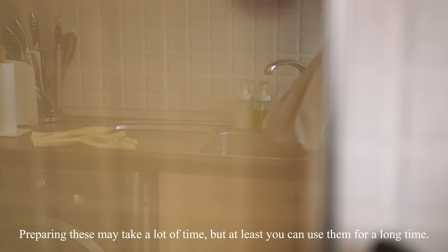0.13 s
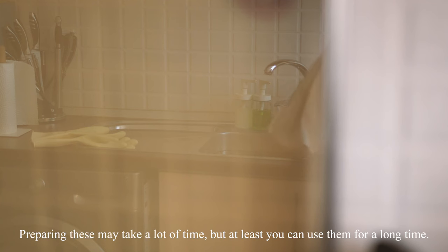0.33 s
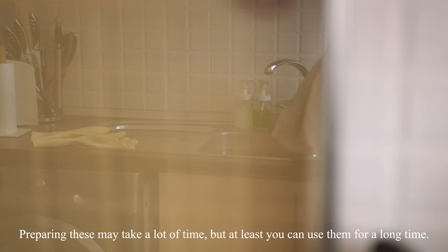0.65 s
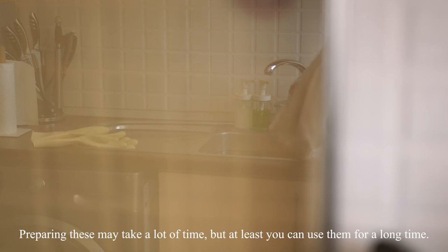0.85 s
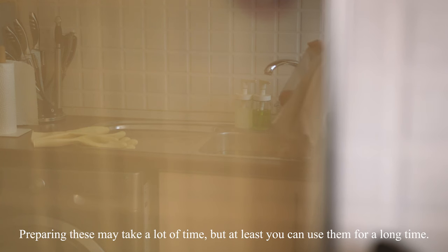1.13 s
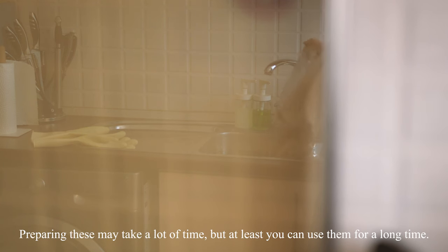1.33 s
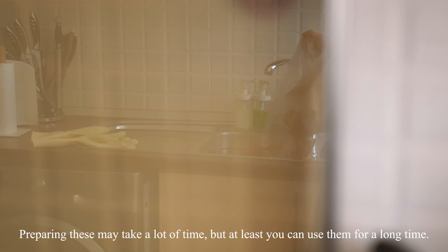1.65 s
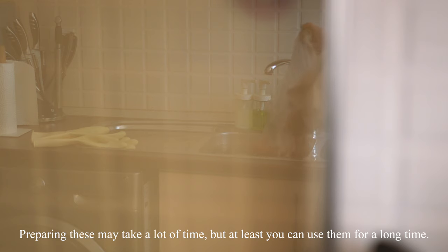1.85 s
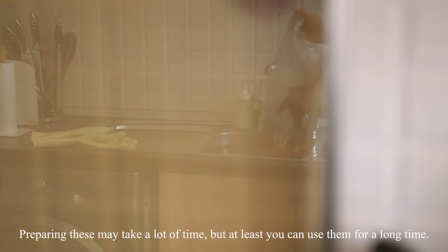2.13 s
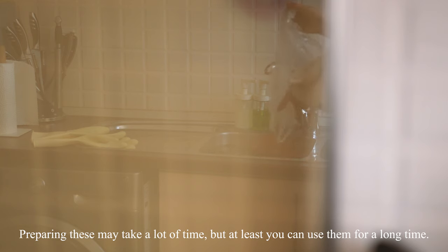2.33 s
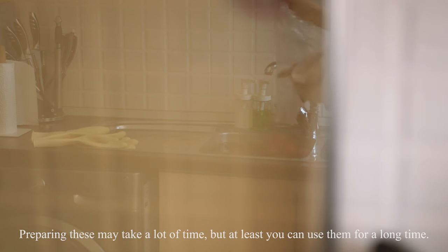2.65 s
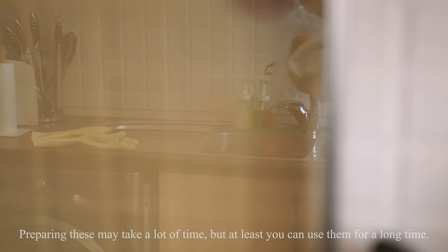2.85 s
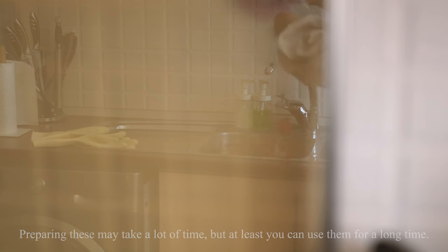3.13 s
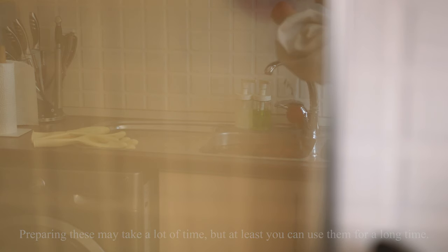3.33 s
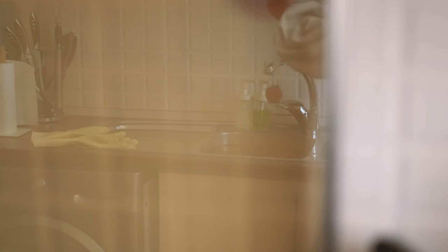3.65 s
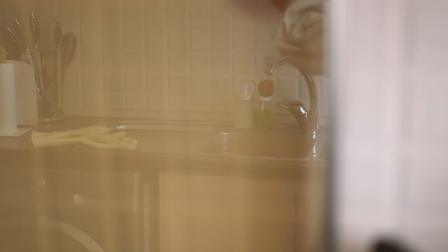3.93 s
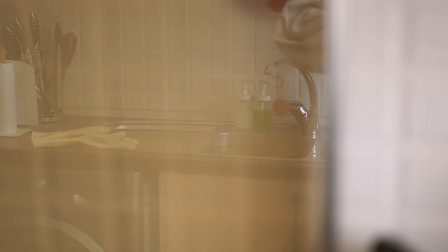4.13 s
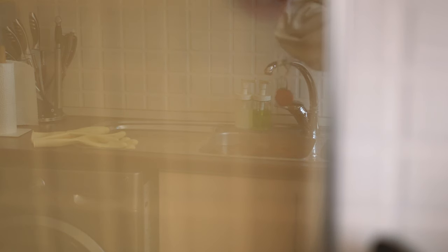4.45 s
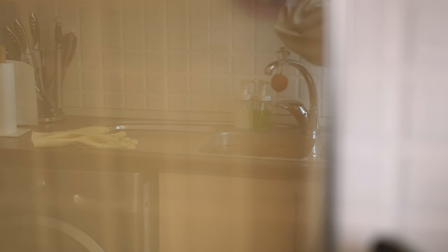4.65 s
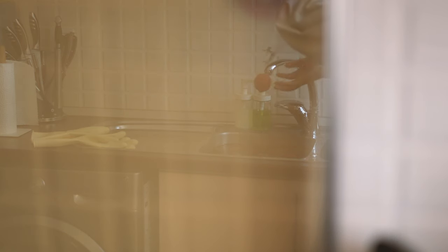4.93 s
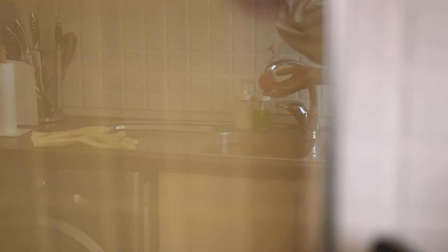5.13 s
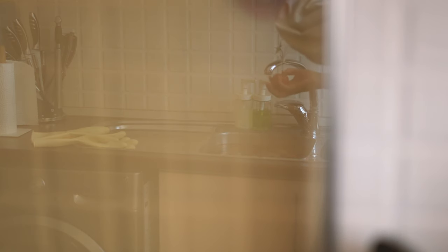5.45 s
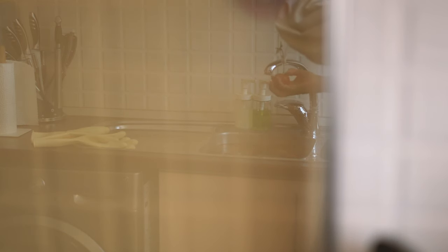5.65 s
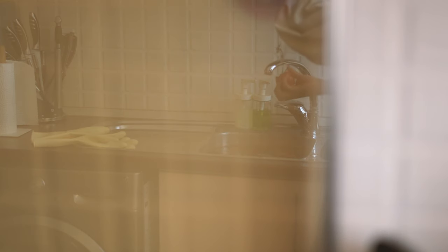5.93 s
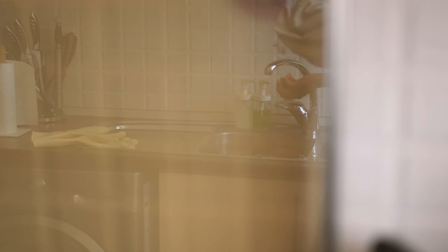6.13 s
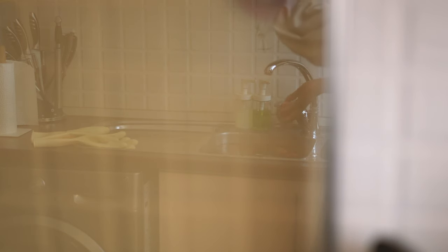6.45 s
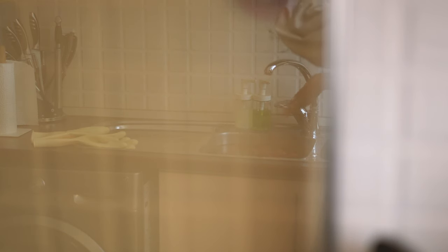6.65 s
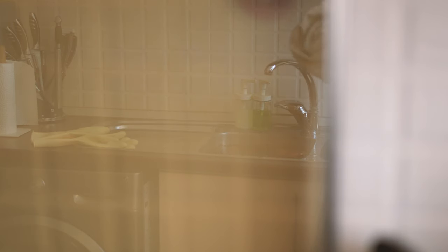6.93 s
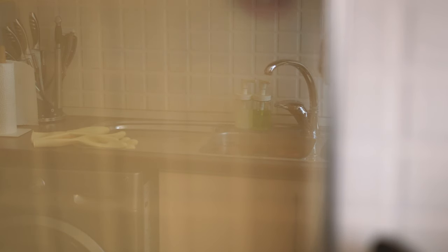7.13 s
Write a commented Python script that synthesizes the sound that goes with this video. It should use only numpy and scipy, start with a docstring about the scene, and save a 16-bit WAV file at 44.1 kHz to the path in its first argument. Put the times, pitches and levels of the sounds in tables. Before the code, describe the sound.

A small tiled kitchen with quiet air and a very faint appliance hum, heard fairly close in stereo, slightly left. From 0 to 1 s a thin fabric bag slides in bright, crinkly swishing strokes with a dull rub beneath. At about 1.1 s fruit begins knocking hollowly; around 1.3 and 1.55 s come the busiest tumbles, hard smacks and sharp cloth flicks, with a brief steel ring and soft low basin boom. More knocks and flicks follow at 1.9 and 2.15 s, the latter the strongest flap. Another small landing comes at 3.0 s, with a last knock near 3.3 s. Rustling continues in short strokes, thinning after 4.4 s. A light tick at 5.15 s and a soft flick at 6.15 s punctuate near silence. At 6.75 s the drain pops and gurgles for a fraction of a second, bubbles dropping in pitch, before a final cloth swish around 7.1 s.

```python
"""A thin fabric bag of fruit is drawn up and emptied over a steel kitchen sink, in a small tiled room.
The cloth, built from shaped noise, swishes in strokes of tiny slips, billows and is flicked.
Its load tumbles and knocks in short decaying tones, and smacks and bumps the basin in noise bursts.
The drain gives one short gurgle of sine bubbles; still air and a faint appliance hum lie underneath."""
import sys
import numpy as np
from scipy import signal
from scipy.fft import rfft, irfft, next_fast_len
from scipy.io import wavfile
from scipy.ndimage import uniform_filter1d, map_coordinates

SR = 44100
rng = np.random.default_rng(int(sys.argv[2]) if len(sys.argv) > 2 else 0)


def materialize(psi):
    """Save the field psi as 16-bit PCM at rate SR to the path in sys.argv[1].

    A 1-D psi becomes a single channel; in a 2-D psi each row is a channel.
    """
    bounded = np.clip(np.atleast_2d(psi).T, -1, 1)
    quanta = np.round(bounded * 32767).astype(np.int16)
    wavfile.write(sys.argv[1], SR, quanta)


N = 321489  # length in samples

# Colour of cloth sliding and creasing. Each row: frequency in Hz, relative density in dB per Hz.
SWISH_SPECTRUM = [(710, -37.5), (1200, -5.5), (2150, -3.5), (3340, -3), (6200, 0.3), (13400, -8),
                  (15800, -12.5)]
# Colour of slack cloth flapping and of drain spray. Each row: frequency in Hz, relative density in dB per Hz.
FLAP_SPECTRUM = [(150, -70), (1000, -16), (1250, -2.5), (3100, -1.5), (4500, -7), (9000, -14)]


def amp(db):
    """Decibels to gain."""
    return 10 ** (np.asarray(db) / 20)


def unit(x):
    """Scale to rms 1."""
    return x / np.sqrt(np.mean(x ** 2) + 1e-20)


def along(points, hz):
    """Read (Hz, value) points on a log frequency axis."""
    f, v = np.transpose(points)
    return np.interp(np.log(hz + 1), np.log(f + 1), v)


def wobble(rate):
    """A smooth random curve through normal draws, rate knots a second."""
    knots = rng.standard_normal(int(N * rate / SR) + 4)
    return map_coordinates(knots, [np.arange(N) * rate / SR])


def filtered(x, response):
    """Multiply the spectrum of x by a response of frequency."""
    m = next_fast_len(N + SR // 2)  # room for the filter to ring out
    return irfft(rfft(x, m) * response(np.fft.rfftfreq(m, 1 / SR)), m)[..., :N]


def resonances(modes, f):
    """Summed response of resonances given as (Hz, width in Hz, dB)."""
    return sum(amp(db) * 1j * f * w / (c * c - f * f + 1j * f * w) for c, w, db in modes)


def add(track, s, sound):
    """Mix a sound in at s seconds."""
    start = round(s * SR)
    part = sound[..., :N - start]
    track[..., start:start + part.shape[-1]] += part


def spread(pair, colour):
    """Two unrelated signals become coloured stereo of rms 1, alike in the bass and wide above."""
    # Likeness of the two channels. Each row: frequency in Hz, correlation from 0 to 1.
    likeness = [(120, 1), (350, 0.96), (700, 0.79), (1400, 0.49), (2500, 0.12)]

    def response(hz):
        turn = np.arccos(np.clip(along(likeness, hz), -1, 1)) / 2
        return amp(along(colour, hz)) * np.array([np.cos(turn), np.sin(turn)])

    mid, side = filtered(pair, response)
    return unit(np.array([mid + side, mid - side]))


def kitchen(x, wet_db):
    """The direct sound plus the short answer of the tiled walls, noise that decays by pitch."""
    # Decay of the tiled room. Each row: frequency in Hz, time in seconds to fall by 60 dB.
    tile_decay = [(200, 0.12), (2000, 0.28), (12000, 0.064)]
    hz, t, z = signal.stft(rng.standard_normal((2, SR // 2)), SR, nperseg=256)
    fading = z * amp(-60 * t / along(tile_decay, hz)[:, None])
    tail = signal.istft(fading, SR, nperseg=256)[1]
    tail = tail / np.linalg.norm(tail[0])
    echo = signal.fftconvolve(np.atleast_2d(x), tail, axes=1)[:, :N]
    return x + amp(wet_db) * echo


def alcove(x, ring_db):
    """The basin and the corner round it favour a few pitches, from low to middle."""
    # Resonances round the sink. Each row: frequency in Hz, width in Hz, relative level in dB.
    sink_modes = [(214, 12, -10), (337.6, 9.9, -8), (589, 24, -5.5), (730, 6.9, 2), (1052, 27, -4),
                  (1662, 25, 10)]
    return unit(filtered(x, lambda f: 1 + amp(ring_db) * resonances(sink_modes, f)))


def room_tone(waver=0.57):
    """Still air as coloured noise, and an appliance hum of sines whose phase wavers (in radians)."""
    # Colour of the still air. Each row: frequency in Hz, relative density in dB per Hz.
    air_colour = [(25, -37.5), (95, -8.5), (160, -14.5), (215, 0), (370, -0.5), (600, 2.5), (2400, -4),
                  (6600, -14), (15800, -37)]
    # Partials of the hum. Each row: frequency in Hz, rms level in dB.
    hum_partials = [(220.7, -77), (301.5, -81)]
    t = np.arange(N) / SR
    hum = np.zeros(N)
    for hz, db in hum_partials:
        hum += amp(db) * np.sqrt(2) * np.sin(2 * np.pi * hz * t + waver * wobble(30))
    air = amp(-63) * spread(rng.standard_normal((2, N)), air_colour)
    return air + hum


def ticks(width=.3):
    """Light contacts: noise through a broad peak (width as a share of its pitch) that dies fast."""
    # Small ticks and snaps. Each row: start in seconds, level in dB, pitch in Hz, 60 dB decay in seconds.
    tick_rows = [(5.152, -36.5, 4420, 0.017), (5.650, -56, 6400, 0.11), (6.499, -53, 6640, 0.027)]
    out, t = np.zeros(N), np.arange(SR // 5) / SR
    for s, db, hz, t60 in tick_rows:
        peak = signal.iirpeak(hz, 1 / width, SR)
        once = signal.lfilter(*peak, rng.standard_normal(len(t)))
        ring = unit(signal.lfilter(*peak, once))
        add(out, s, amp(db - 60 * t / t60) * ring)
    return kitchen(out, wet_db=1)


def bubble(hz, db, t60=0.011, attack=.0009, overtone_db=-21):
    """One bubble swells softly and dies within milliseconds; it has a weak overtone."""
    t = np.arange(SR // 20) / SR
    phase = 2 * np.pi * hz * t
    tone = np.sin(phase) + amp(overtone_db) * np.sin(2 * phase)
    return amp(db - 60 * t / t60) * (1 - np.exp(-t / attack)) * tone


def gurgle(spray_s=6.8, spray_width_s=0.041, spray_db=-46, count=14):
    """A few sharp pops, then a string of bubbles growing larger and lower, with a puff of spray around them."""
    # Bubbles popping in the drain. Each row: start in seconds, pitch in Hz, level in dB.
    pop_rows = [(6.756, 1850, -26.5), (6.7615, 1900, -22.5), (6.7664, 1680, -26), (6.7753, 1870, -28),
                (6.7827, 1030, -31), (6.792, 2030, -28)]
    # Course of the trailing string. Each row: time in seconds, bubble pitch in Hz, level in dB.
    string_course = [(6.795, 1100, -34), (6.83, 920, -37), (6.88, 716, -41)]
    out, t = np.zeros(N), np.arange(N) / SR
    for s, hz, db in pop_rows:
        add(out, s, bubble(hz, db))
    times, pitch, level = np.transpose(string_course)
    slots = np.linspace(times[0], times[-1], count)
    for s, (late, size, strength) in zip(slots, rng.standard_normal((count, 3))):
        hz = np.interp(s, times, pitch) * np.exp(size / 20)
        db = np.interp(s, times, level) + strength
        add(out, s + 0.00146 * late, bubble(hz, db))
    puff = amp(spray_db) * np.exp(-((t - spray_s) / spray_width_s) ** 2)
    spray = puff * spread(rng.standard_normal((2, N)), FLAP_SPECTRUM)
    return kitchen(out, wet_db=-3.5) + spray


def bumps(rise=0.0059, t60=0.97):
    """Padded blows make the basin and its cupboard boom softly: low noise, rise and decay in seconds."""
    # Soft bumps of the load on the basin. Each row: start in seconds, level in dB.
    bump_rows = [(.98, -44), (1.28, -41), (1.55, -46.5), (2.05, -45), (2.19, -49), (3.01, -49.5),
                 (6.80, -55.5)]
    # Colour of the boom. Each row: frequency in Hz, relative density in dB per Hz.
    boom_colour = [(25, -38), (50, -23), (95, -1.5), (155, 3), (340, 1), (450, 5.5), (750, -13.5)]
    force, t = np.zeros(N), np.arange(SR) / SR
    for s, db in bump_rows:
        add(force, s, amp(db - 60 * t / t60) * (1 - np.exp(-t / rise)))
    return force * spread(rng.standard_normal((2, N)), boom_colour)


def strikes(t60=0.15):
    """The heaviest pieces land hard, each with a broad, short smack of noise."""
    # Hard landings. Each row: start in seconds, level in dB.
    strike_rows = [(1.285, -30), (1.314, -32), (1.588, -34), (3.037, -31.5), (3.066, -35)]
    # Colour of the smack. Each row: frequency in Hz, relative density in dB per Hz.
    smack_colour = [(60, -55), (300, -15), (750, -8), (1150, -1), (1550, -17), (2900, -3), (10000, -10)]
    force, t = np.zeros(N), np.arange(SR // 2) / SR
    for s, db in strike_rows:
        add(force, s, amp(db - 60 * t / t60))
    return force * spread(rng.standard_normal((2, N)), smack_colour)


def tumbles(rate=380, die_cycles=26, scatter=0.167):
    """Pieces jostle, rate knocks a second, each a few hollow cycles at a pitch of its own."""
    # Flurries of small knocks. Each row: start in seconds, length in seconds, pitch in Hz, level in dB.
    flurry_rows = [(1.253, 0.046, 1520, -30.5), (1.284, .04, 2100, -34), (1.301, .022, 743, -31),
                   (1.584, .022, 985, -39), (1.588, .022, 2480, -32), (1.871, .065, 2240, -37),
                   (3.033, 0.016, 960, -35.5)]
    out, t = np.zeros(N), np.arange(SR // 8) / SR
    all_draws = rng.standard_normal((len(flurry_rows), 64, 3))
    for (s, length, hz, db), draws in zip(flurry_rows, all_draws):
        flurry = np.zeros(N)
        for k, (late, size, strength) in enumerate(draws[:round(length * rate) + 1]):
            cycles = hz * np.exp(scatter * size) * t
            envelope = amp(2 * strength - 60 * cycles / die_cycles) * (1 - np.exp(-cycles))
            add(flurry, s + (k + abs(late) / 2) / rate, envelope * np.sin(2 * np.pi * cycles))
        # the level holds for the flurry's energy averaged over its length
        out += amp(db) * flurry * np.sqrt(length * SR) / np.linalg.norm(flurry)
    return kitchen(out, wet_db=-6.5)


def knocks(attack=0.0028, rough=1.15):
    """Each knock is a hollow tone, its phase roughened (radians), and rings the steel near its pitch."""
    # Hollow knocks of the load against the basin. Each row: start in seconds, level in dB, pitch in Hz, 60 dB
    # decay in seconds, steel ring in dB relative to the knock.
    knock_rows = [(1.112, -27.5, 1685, 0.077, -19), (1.272, -24, 1610, 0.097, -17),
                  (1.552, -20, 1664, 0.072, -10.5), (1.865, -34, 1690, 0.091, -16),
                  (1.992, -27.5, 1596, .06, -22), (2.192, -42, 451, .33, -25),
                  (2.966, -36, 1030, 0.12, -24), (3.034, -34, 2040, 0.081, -1),
                  (3.101, -27.5, 2080, 0.049, -24), (3.299, -33, 1560, .06, -30)]
    # Ring of the basin. Each row: frequency in Hz, relative level in dB, 60 dB decay in seconds.
    steel_modes = [(1002, -14, 0.15), (1610, -6.5, 0.64), (1683, -13, 0.51), (2046, -4, 0.3),
                   (2640, 1.5, 0.25)]
    out, t = np.zeros(N), np.arange(SR // 2) / SR
    for s, db, hz, t60, steel_db in knock_rows:
        phase = 2 * np.pi * hz * t + rough * wobble(hz / 6)[:len(t)]
        hollow = amp(-60 * t / t60) * np.sin(phase)
        ring = np.zeros(len(t))
        for f, level, life in steel_modes:
            nearness = min(f / hz, hz / f) ** 4
            decay = amp(level + rng.normal(0, 3.6) - 60 * t / life)
            ring += decay * nearness * np.cos(2 * np.pi * f * t)
        add(out, s, amp(db) * (1 - np.exp(-t / attack)) * (hollow + amp(steel_db) * ring))
    return kitchen(out, wet_db=-1.5)


def friction(colour, grain_db, patchy_db, catch_db):
    """Countless tiny slips of uneven size, as noise; the colour shifts as the folds move."""
    unevenness = amp(grain_db * wobble(2500) + catch_db * wobble(110))
    slips = rng.standard_normal((2, N)) * unevenness
    z = signal.stft(slips, nperseg=512)[2]
    # random patches in frequency and time
    field = uniform_filter1d(rng.standard_normal(z.shape[1:]), size=7, axis=0)
    field = uniform_filter1d(field, size=8, axis=1)
    patchy = signal.istft(z * amp(patchy_db * unit(field)), nperseg=512)[1][:, :N]
    return spread(patchy, colour)


def flicks():
    """A flick is a burst of slips that swells in milliseconds and dies; slack cloth flaps with it."""
    # Quick flicks of the cloth. Each row: start in seconds, level in dB, rise in seconds,
    # 60 dB decay in seconds, hollow flap in dB relative to the burst.
    flick_rows = [(1.197, -21, .003, 0.15, -20), (1.551, -18.5, 0.0026, 0.088, -12),
                  (1.858, -21.5, 0.0063, 0.11, -2), (2.155, -15, 0.0098, 0.16, -1),
                  (6.163, -30.5, 0.0072, 0.51, -6.5), (6.535, -50.5, 0.003, 0.36, -22)]
    # Colour of the burst. Each row: frequency in Hz, relative density in dB per Hz.
    burst_colour = [(100, -28), (400, -9.5), (850, -6), (1300, -7), (3000, -3.5), (6500, 1.5),
                    (15000, -10.5)]
    force, t = np.zeros((2, N)), np.arange(SR // 2) / SR
    for s, db, rise, t60, flap_db in flick_rows:
        envelope = amp(db - 60 * t / t60) * (1 - np.exp(-t / rise)) ** 2
        add(force, s, np.outer(amp([0, flap_db]), envelope))
    burst = force[0] * friction(burst_colour, grain_db=2.5, patchy_db=0.0, catch_db=-2.4)
    flap = force[1] * spread(rng.standard_normal((2, N)), FLAP_SPECTRUM)
    return burst + flap


def crinkles(rate, scatter_db):
    """Single creases snap at random, rate a second: noise decaying in about 1 ms, overall rms 1."""
    sizes = amp(scatter_db * np.minimum(rng.exponential(size=N), 2))
    snaps = (rng.random(N) < rate / SR) * sizes
    decay = np.exp(-np.arange(SR // 50) / (SR / 1000))
    force = signal.fftconvolve(snaps, decay)[:N]
    dry_snaps = spread(force * rng.standard_normal((2, N)), SWISH_SPECTRUM)
    return unit(kitchen(dry_snaps, wet_db=2.5))


def pulls(attack_s=0.034, t60_s=0.65, held_still_db=-62.5):
    """Loudness of sliding: each pull sets in quickly, swells or slackens, then slides to rest."""
    # Pulls of cloth over cloth. Each row: start in seconds, length in seconds, level at mid-pull in dB,
    # swell from start to end in dB.
    stroke_rows = [(-.02, 0.34, -30.5, 3.5), (0.317, 0.22, -26, 4.5), (0.585, .18, -31, 2.5),
                   (0.821, 0.18, -28, 5.5), (1.032, 0.13, -31, 8), (1.173, 0.32, -26, -1.5),
                   (1.542, .15, -30, 1.5), (1.751, 0.13, -28, 3), (1.899, 0.12, -28.5, -0.5),
                   (2.037, 0.067, -32, 0), (2.202, 0.21, -41, 11.5), (2.385, 0.082, -38, 14),
                   (2.548, 0.061, -28, 2), (2.648, 0.12, -34, 12.5), (2.854, 0.099, -31, 0.5),
                   (3.003, 0.18, -35.5, -2.5), (3.192, 0.13, -34, -1.5), (3.347, .18, -31, 2),
                   (3.58, 0.12, -34, 4), (3.744, 0.28, -29.5, 1), (4.08, 0.13, -32.5, 8),
                   (4.297, 0.039, -29.5, -1.5), (4.4, 0.2, -41, -3.5), (4.685, 0.12, -43, 1),
                   (4.857, 0.28, -48, -5.5), (5.2, .1, -53, -2), (5.56, .04, -60, -2),
                   (5.81, .12, -55, 8.5), (5.995, 0.14, -49.5, -2), (6.294, 0.086, -52.5, 5.5),
                   (6.728, 0.46, -47, 12.5), (7.104, 0.2, -34, -4.5)]
    t, power = np.arange(N) / SR, np.full(N, amp(held_still_db) ** 2)
    for start, length, db, swell_db in stroke_rows:
        age = np.maximum(t - start, 0)
        pull_db = db + swell_db * (np.minimum(age / length, 1) - .5)
        release_db = 60 * np.clip(age - length, 0, t60_s * 2) / t60_s
        power += (np.minimum(age / attack_s, 1) * amp(pull_db - release_db)) ** 2
    return np.sqrt(power)


def shifts(rise_s=0.047, t60_s=0.83):
    """Loudness of billow and rub as the load shifts and drags the bag: soft rise, slow settling."""
    # Shifts of the load. Each row: time of the peak in seconds, billow in dB, rub in dB.
    shift_rows = [(.4, -50, -37.5), (.55, -48, -35), (1.01, -46.5, -36), (1.18, -42, -40),
                  (1.3, -36.5, -26.5), (1.572, -40, -34), (1.97, -53, -40.5), (2.22, -50, -41),
                  (3.038, -50.5, -39), (4.35, -60, -54.5), (7.25, -65, -42)]
    t, power = np.arange(N) / SR, np.zeros((2, N))
    for s, billow_db, rub_db in shift_rows:
        rise = np.exp(-np.clip((s - t) / rise_s, 0, 10) ** 2)
        settling = amp(-60 * np.maximum(t - s, 0) / t60_s)
        power += np.outer(amp([billow_db, rub_db]), rise * settling) ** 2
    return np.sqrt(power)


def cloth(slacken_s=2.3, early_billow_db=-25.5, late_billow_db=-35, rub_db=-12):
    """Sliding gives a bright swish with crinkles, pressure a duller rub, billowing a soft flutter."""
    # Colour of the rub. Each row: frequency in Hz, relative density in dB per Hz.
    rub_colour = [(40, -60), (150, -34), (300, -10.5), (520, -5), (900, 3.5), (1600, -2), (2400, 0.5),
                  (5000, -12)]
    # Colour of the billow. Each row: frequency in Hz, relative density in dB per Hz.
    billow_colour = [(30, -55), (100, -31), (150, -13.5), (215, -4.5), (400, 0), (560, -1), (1000, -28)]
    slide = pulls() * amp(1.0 * wobble(32))  # slightly uneven, by about 1 dB
    heave, press = shifts()
    # rub and billow of a pull are set relative to its slide;
    # the billow of each pull drops once the bag hangs slacker
    bulk = amp(np.where(np.arange(N) / SR > slacken_s, late_billow_db, early_billow_db))
    hiss = friction(SWISH_SPECTRUM, grain_db=1.1, patchy_db=1.11, catch_db=.5)
    swish = slide * (hiss + amp(-13.0) * crinkles(rate=140, scatter_db=3))
    rubbing = friction(rub_colour, grain_db=0.5, patchy_db=1.5, catch_db=-1.0)
    rub = np.hypot(amp(rub_db) * slide, press) * alcove(rubbing, ring_db=-3.5)
    flutter = friction(billow_colour, grain_db=1.0, patchy_db=4.5, catch_db=-1.0)
    billow = np.hypot(bulk * slide, heave) * alcove(flutter, ring_db=8.5)
    return swish + rub + billow


def scene():
    """Bag, load, basin, drain and room together, a little left of centre at the microphone."""
    # Tilt of the stereo image. Each row: frequency in Hz, left minus right in dB.
    left_lean = [(150, 0), (350, 1.1), (1400, 1), (9000, 0.2), (15000, 3.5)]
    bag = cloth() + flicks()
    load = knocks() + tumbles() + strikes() + bumps()
    mix = bag + load + gurgle() + ticks() + room_tone()
    return filtered(mix, lambda hz: amp(np.outer([.5, -.5], along(left_lean, hz))))


def record(dry):
    """The recorder keeps nothing above its band limit of 15850 Hz."""
    return filtered(dry, lambda hz: hz < 15850)


dry = scene()
out = record(dry)
materialize(out)
```